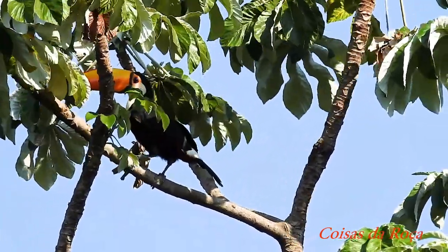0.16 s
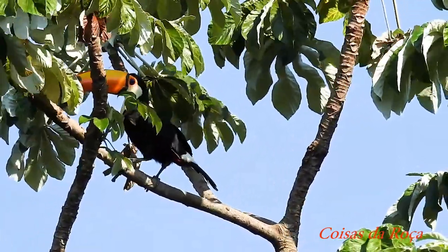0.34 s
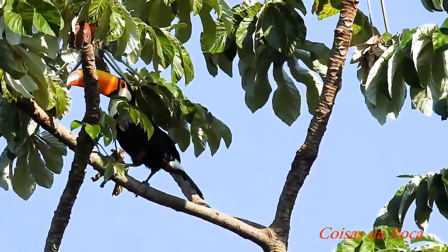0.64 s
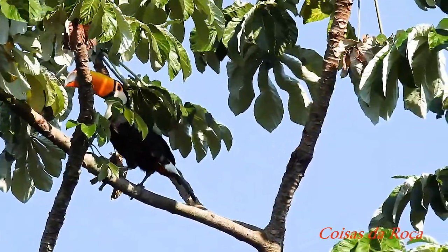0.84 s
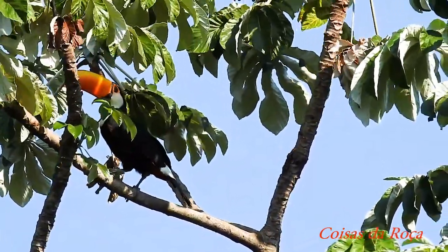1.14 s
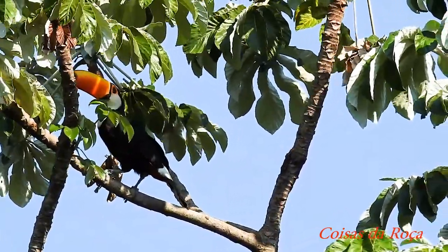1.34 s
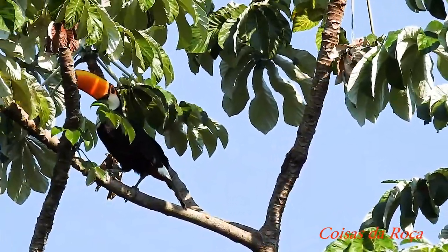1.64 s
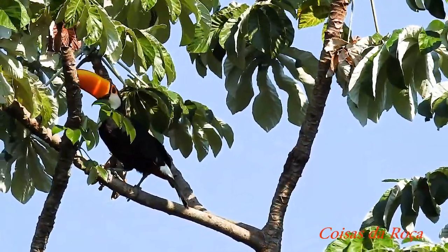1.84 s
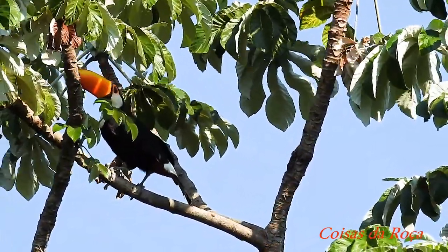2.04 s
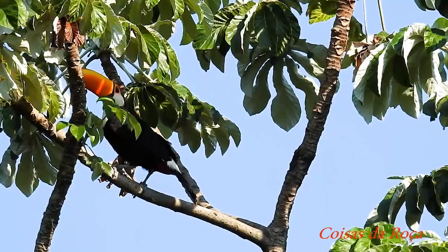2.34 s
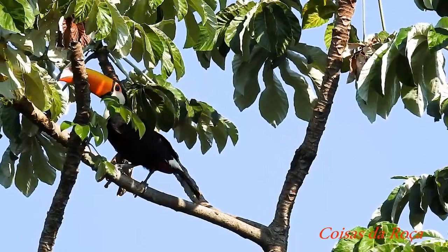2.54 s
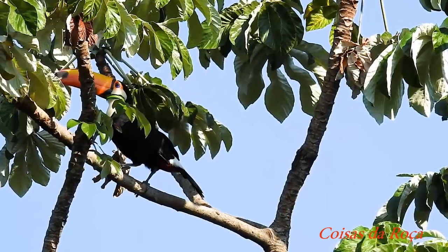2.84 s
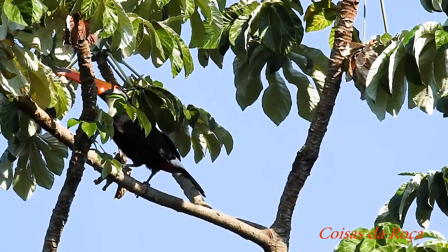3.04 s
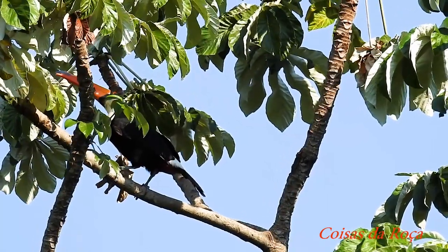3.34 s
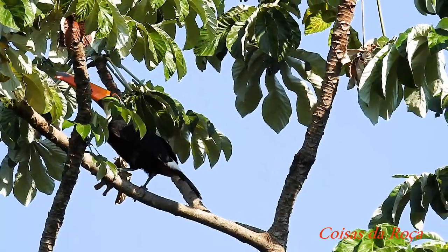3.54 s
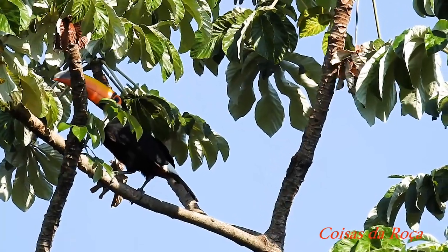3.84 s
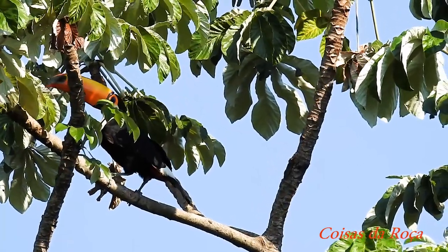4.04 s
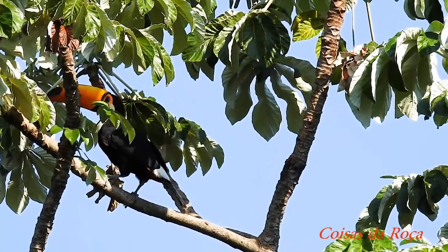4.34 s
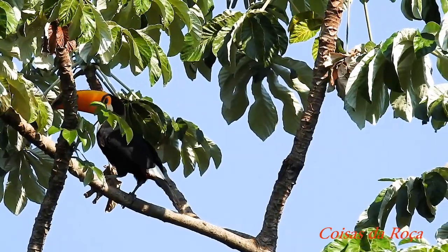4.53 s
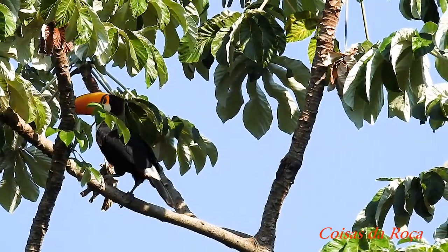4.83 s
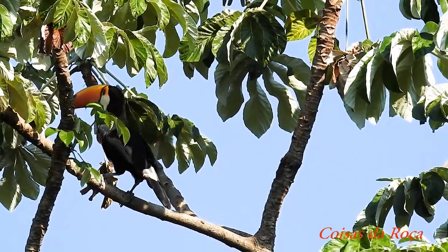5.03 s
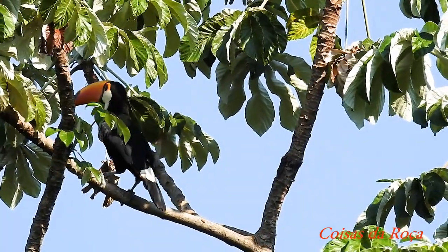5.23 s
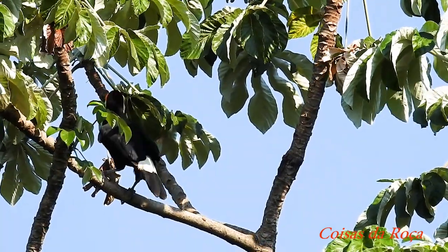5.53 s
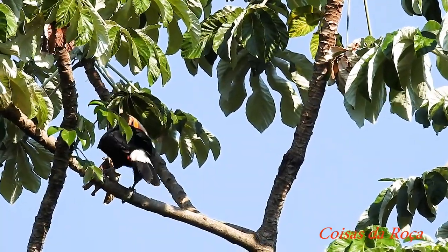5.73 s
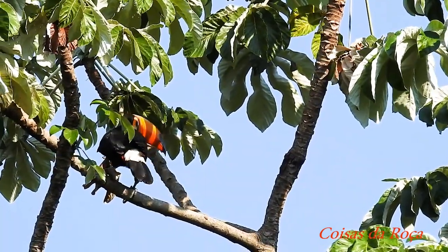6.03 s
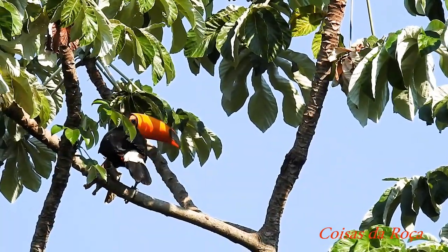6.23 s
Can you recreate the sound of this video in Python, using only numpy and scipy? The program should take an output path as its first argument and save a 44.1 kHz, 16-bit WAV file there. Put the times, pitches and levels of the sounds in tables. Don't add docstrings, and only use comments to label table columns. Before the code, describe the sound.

A big-billed bird gives slow hollow croaking rattles among trees while another squawks hoarsely and whistles one arched note over crickets and insect haze.

```python
import sys
import numpy as np
from scipy import signal
from scipy.fft import rfft, irfft, next_fast_len
from scipy.io import wavfile
from scipy.ndimage import uniform_filter1d, map_coordinates

SR = 44100
rng = np.random.default_rng(int(sys.argv[2]) if len(sys.argv) > 2 else 0)


def level_to_linear(level):
    exponent = np.asarray(level, float) / 20
    return 10 ** exponent


def master_out(mix):
    frames = np.transpose(np.atleast_2d(mix))
    ceiling = np.clip(frames, -1, 1)
    pcm = np.round(ceiling * 32767).astype(np.int16)
    wavfile.write(sys.argv[1], SR, pcm)


N = 281358
T = np.arange(N) / SR


def unit(x):
    return x / np.sqrt(np.mean(x ** 2) + 1e-20)


def along(points, hz):
    f, v = np.transpose(points)
    return np.interp(np.log(hz + 1), np.log(f + 1), v)


def curves(rows):
    s, *cols = np.transpose(rows)
    gate = np.clip(np.minimum(T - s[0], s[-1] - T) / 0.0027, 0, 1)
    return [np.interp(T, s, c) for c in cols] + [gate]


def wobble(rate):
    return map_coordinates(rng.standard_normal(int(N * rate / SR) + 4), [T * rate])


def bell(centre, half):
    return np.exp(-((T - centre) / half) ** 2)


def filtered(x, response):
    m = next_fast_len(N + SR // 2)
    return irfft(rfft(x, m) * response(np.fft.rfftfreq(m, 1 / SR)), m)[..., :N]


def cavities(modes):
    def response(f):
        return sum((-1) ** k * level_to_linear(db) * 1j * f * w / (c * c - f * f + 1j * f * w)
                   for k, (c, w, db) in enumerate(modes))
    return response


def rush(spectrum, alike, patchy_db):
    z = signal.stft(rng.standard_normal((2, N)), nperseg=512)[2]
    field = uniform_filter1d(rng.standard_normal(z.shape[1:]), size=6, axis=0)
    field = uniform_filter1d(field, size=14, axis=1)
    pair = signal.istft(z * level_to_linear(patchy_db * unit(field)), nperseg=512)[1][:, :N]

    def response(hz):
        turn = np.arccos(np.clip(along(alike, hz), -1, 1)) / 2
        return level_to_linear(along(spectrum, hz)) * [np.cos(turn), np.sin(turn)]
    mid, side = filtered(pair, response)
    return unit(np.array([mid + side, mid - side]))


# frequency_hz, t60_s
TREE_DECAY = [(500, 0.19), (1500, 0.39), (3500, 0.42), (9000, 0.31)]


def trees(x, wet_db, side_db, pan_db, gap):
    hz, t, z = signal.stft(rng.standard_normal((2, SR * 3 // 5)), SR, nperseg=256)
    decay = level_to_linear(-60 * t / along(TREE_DECAY, hz)[:, None])
    tail = signal.istft(z * decay, SR, nperseg=256)[1]
    tail = np.pad(tail / np.linalg.norm(tail[0]), ((0, 0), (round(gap * SR), 0)))
    mid, side = signal.fftconvolve(x[None], tail, axes=1)[:, :N] * level_to_linear([[wet_db], [side_db]])
    return (x + mid) * level_to_linear([[pan_db / 2], [-pan_db / 2]]) + side * [[1], [-1]]


# frequency_hz, level_db
HAZE = [(60, -21), (100, -13.5), (200, -8.5), (400, -9), (800, -8), (1600, -10), (2600, -12), (3600, -15),
        (4300, -10), (5000, -8.5), (6900, -10), (7500, -17), (10000, -21), (15800, -23)]
# frequency_hz, likeness (0 to 1)
ALIKE = [(60, 0.98), (130, 0.94), (290, 0.62), (640, 0.081), (1410, 0.0073), (3100, 0.38), (6820, 0.52),
         (15000, 1)]


def haze():
    level_db = -54.5 + 0.23 * wobble(1.3) + 0.17 * wobble(24)
    return level_to_linear(level_db) * rush(HAZE, ALIKE, patchy_db=2.4)


# frequency_hz, level_db
CHORUS = [(5600, -16), (5900, -2), (6150, 2), (6450, -4), (6800, -26)]
# time_s, level_db
CHORUS_SWELL = [(0, -61), (.8, -63), (1.3, -59.5), (2.5, -58), (3.1, -60.5), (4.3, -63.5), (5.1, -55.5),
                (5.6, -58.5), (6.38, -56.5)]


def chorus():
    level_db = curves(CHORUS_SWELL)[0] + 0.83 * wobble(47)
    return level_to_linear(level_db) * rush(CHORUS, ALIKE, patchy_db=4.0)


# pitch_hz, width_hz, level_db
DRONES = [(467.7, 7.2, -71.5), (740, 35, -72.5)]


def drones():
    pause_s, pause_db, return_s = 3.75, -13, 0.98
    out = np.zeros(N)
    for hz, width, db in DRONES:
        tone = unit(filtered(rng.standard_normal(N), cavities([(hz, width, 0)])))
        out += level_to_linear(db + 0.6 + 0.98 * wobble(3.6)) * tone
    dip = (T > pause_s) * np.clip(1 - (T - pause_s) / return_s, 0, 1)
    return level_to_linear(pause_db * dip) * out


# time_s, half_length_s, level_db
GUSTS = [(.8, .15, -84), (1.967, 0.07, -65), (2.164, 0.031, -72), (2.54, 0.14, -70), (3.073, .03, -60),
         (3.222, 0.078, -48.5), (3.565, 0.051, -59.5), (4.045, 0.045, -61), (4.578, .06, -66),
         (4.762, 0.062, -57.5), (4.932, 0.047, -57), (5.048, 0.046, -50), (5.18, .04, -48),
         (5.42, 0.071, -68), (5.804, 0.097, -70), (6.022, 0.033, -69), (6.2, 0.032, -63),
         (6.38, 0.059, -69)]


def gusts():
    calm = level_to_linear(-76.5 + 3.2 * wobble(11))
    return calm + sum(level_to_linear(db) * bell(s, half) for s, half, db in GUSTS)


# frequency_hz, level_db
BUMP = [(15, -36), (25, -13.5), (40, 2), (65, -1), (115, -9), (250, -34), (400, -87)]


def wind():
    rumble = rush(BUMP, [(30, 0.985)], patchy_db=.7)
    return gusts() * unit(level_to_linear(1.5 * wobble(20)) * rumble)


# pitch_hz, level_db
WHINE = [(15734.33, -71), (15747.25, -76)]


def whine():
    return sum(level_to_linear(db + 3.5) * np.cos(2 * np.pi * hz * T) for hz, db in WHINE)


# start_s, end_s, stroke_rate_hz, level_db
CHIRPS = [
    (0.1526, 0.73, 34.7, -58),
    (1.1834, 1.73, 34.65, -57),
    (2.1865, 2.75, 34.7, -57),
    (3.1861, 3.75, 34.55, -56),
    (4.669, 4.8, 35.3, -59),
    (5.2952, 5.87, 34.7, -57),
    (6.266, 6.38, 33.0, -59),
]


def cricket():
    out = np.zeros(N)
    for start, end, rate, db in CHIRPS:
        stroke = (T - start) * rate
        fade = np.clip((T - start) / 0.039, 0, 1) * (stroke > 0) * (T < end)
        luck = rng.random((60, 2))[np.clip(stroke, 0, 59).astype(int)]
        shape = np.sin(np.pi * (stroke % 1)) ** 2
        tone = np.sin(2 * np.pi * (6070 * T + luck[:, 1]))
        out += level_to_linear(db + 2.5 + 7.3 * luck[:, 0]) * fade * shape * tone
    return trees(out, wet_db=-27, side_db=-39.0, pan_db=-3.5, gap=.004)


def slaps(end, db, bend, turn_db, bill_db):
    slowest_gap_s, quickens = .0245, .175
    build_db, dying_db = -17, -19
    throat_hz, slack_hz_per_db, turn_hz_per_db = 1640, 12, -30
    click_db, click_holds = -11, .55
    back = np.arange(8)
    gaps = slowest_gap_s * np.maximum(back, 1.0) ** -quickens * (back > 0)
    s = np.append(end - np.cumsum(gaps), end + slowest_gap_s)
    under = np.append(build_db * (back / back[-1]) ** bend, dying_db)
    first = np.append(back == back[-1], 0)
    turn = turn_db * np.append(back < 3, 0)
    luck = rng.standard_normal((9, 3)) * [.6, 35, 1.2]
    click = click_db + bill_db - click_holds * under - 9 * first
    hz = throat_hz + slack_hz_per_db * under + turn_hz_per_db * turn
    return np.c_[s, np.c_[db + under + turn - 5 * first, hz, click] + luck]


# frequency_hz, width_hz, level_db
BILL = [(624, 143, -6.5), (1027, 41, -5.5), (1370, 247, 5), (1954, 310, 2), (2380, 160, -1), (2900, 210, 5),
        (3460, 500, -4.5), (3940, 120, -5), (4520, 490, -11.5), (8200, 18000, -30)]


def rattle(rows, shake, wet_db, side_db, pan_db):
    tone, click, t = np.zeros(N + SR), np.zeros(N + SR), np.arange(SR // 25) / SR
    swell = np.exp(-((t - .006) / np.where(t < .006, .0038, .0046)) ** 2)
    swell += 0.15 * np.exp(-((t - .015) / 0.005) ** 2)
    snap = np.exp(-((t - .005) / np.where(t < .005, .003, .006)) ** 2)
    for s, db, hz, click_db in rows:
        start = round((s - .003) * SR)
        tone[start:][:len(t)] += level_to_linear(db - 3.0) * swell * np.sin(2 * np.pi * (hz * t + rng.random()))
        puff = snap * rng.standard_normal(len(t))
        click[start - 60:][:len(t)] += level_to_linear(db + click_db + 10.0) * puff
    shaky = tone[:N] * (1 + shake * wobble(600))
    return trees(shaky + filtered(click[:N], cavities(BILL)), wet_db, side_db, pan_db, gap=0.0093)


# last_full_slap_s, peak_db, build_bend (how early it builds), turn_away_db, bill_db
CROAKS = [
    (1.3515, -21.5, 1.9, 0, 0),
    (2.897, -18, 1.6, 0, -2),
    (4.9835, -17, 2.2, -7.5, -3.5),
    (5.742, -19.5, 1.1, 0, -5),
]


def croaks():
    rows = np.concatenate([slaps(*row) for row in CROAKS])
    return rattle(rows, .15, wet_db=-11, side_db=-21.5, pan_db=-1.5)


def opening(opens, full, closes, fade, db):
    opening_db, choke_s, choke_db_per_s = 21.5, 2.0314, 904
    rise = opening_db * np.clip((T - full) / (full - opens), None, 0)
    fall = fade * np.clip(T - closes, 0, None) + choke_db_per_s * np.clip(T - choke_s, 0, None)
    return level_to_linear(db + rise - fall) * (T > opens)


# opens_s, full_s, closes_s, fade_db_per_s, level_db
SQUAWK = [
    (1.83, 1.90, 1.9645, 219, -35),
    (1.846, 1.853, 1.862, 95, -29),
    (1.835, 1.866, 2.03, 304, -29),
    (1.85, 1.916, 2.02, 306, -32.5),
]
# frequency_hz, width_hz, level_db
CHEST = [(373, 91, -12), (519.5, 39.4, -2.5), (730, 140, -11)]
THROAT = [(920, 62, -4), (1242, 200, 5), (1562, 120, 3.5), (1859, 148, 6.5)]
MOUTH = [(2444, 150, -3.5), (2710, 82, 1.5), (2788, 45, 5.5), (3250, 510, -4)]
BEAK = [(3600, 57, -6.5), (3580, 100, 3.5), (3800, 970, -9), (4440, 770, -3), (4990, 360, -2),
        (6270, 5000, -10.5)]
# top_s, peak_db, pitch_hz, half_length_s
THROBS = [
    (1.839, -28.5, 2480, 0.0018),
    (1.856, -20, 1506, 0.0035),
    (1.893, -20, 2594, 0.0038),
    (1.924, -15, 3620, 0.0011),
    (1.945, -11, 3560, 0.0022),
    (1.964, -11.5, 3628, 0.0026),
    (1.987, -13.5, 3590, 0.0034),
    (2.01, -22, 3600, 0.0034),
    (2.035, -26, 3600, 0.0025),
]
# start_s, fade_s, level_db
PUFFS = [
    (1.785, 0.027, -54),
    (1.861, 0.18, -41.5),
]
# frequency_hz, level_db
AIR = [(4500, -30), (5500, -12), (7000, -5.5), (8500, -1.5), (10500, -5), (11500, -27)]


def squawk():
    repeat_s = 4.05687
    cycles = np.cumsum(245 * (1 + 0.066 * wobble(60))) / SR
    pulses = np.diff(np.floor(cycles), prepend=0) * level_to_linear(3 * wobble(150))
    gated = rng.standard_normal(N) * np.exp(-2.5 * (cycles % 1))
    voice = 0.59 * unit(pulses) + .8 * unit(gated)
    voice = voice * level_to_linear(2.5 * wobble(200) + 2.5 * wobble(60))
    grunt = bell(1.786, .012)
    grunt_db = [-52, -55, -55.5, -93]
    call = np.zeros(N)
    for row, db, modes in zip(SQUAWK, grunt_db, (CHEST, THROAT, MOUTH, BEAK)):
        def steep(hz):
            return cavities(modes)(hz) ** 1.495 / (1 + (hz / 7200) ** 14)
        call += (opening(*row) + level_to_linear(db) * grunt) * unit(filtered(voice, steep))
    t = T[:round(2.2 * SR)]
    for s, db, hz, half in THROBS:
        call[:len(t)] += level_to_linear(db) * np.exp(-((t - s) / half) ** 2) * np.sin(2 * np.pi * hz * t)
    breath = sum(level_to_linear(db) * np.clip((T - s) / 0.0038, 0, 1) * np.exp(-np.abs(T - s) / fade)
                 for s, fade, db in PUFFS)
    breath = breath * np.clip((2.1 - T) / .1, 0, 1)
    once = trees(call, wet_db=-2, side_db=-6.5, pan_db=0.2, gap=.006)
    once = once + breath * rush(AIR, [(7000, .1)], patchy_db=1)
    return once + np.roll(once, round(repeat_s * SR), axis=1) * (T > repeat_s)


# time_s, pitch_hz, effort_db
WHISTLE = [
    (3.45, 639, -59.5),
    (3.515, 990, -35.5),
    (3.56, 1273, -32.5),
    (3.65, 1424, -27.5),
    (3.74, 1432, -38.5),
    (3.785, 1416, -24.5),
    (3.95, 1288, -26),
    (4.08, 1070, -30),
    (4.18, 770, -54),
]
TONES = [-14, -12.5, -6, -24]
SWINGS = [.7, .4, 1.0, -.2]
# frequency_hz, level_db
GAPE = [(2500, -11), (3500, -13), (5000, -22), (6000, -24), (7200, -26.5), (8500, -26), (10000, -38.5),
        (11500, -45), (13000, -68)]


def whistle():
    hz, db, on = curves(WHISTLE)
    rasp = bell(WHISTLE[0][0], .105) + .6 * bell(WHISTLE[-1][0], .085)
    pinch = -14 * np.exp(-((hz - 1432) / 11.6) ** 2)
    loud = np.clip(db + 31.5, 0, None) + np.clip(db + 33, -9, 0)
    levels = []
    for k, (tone, swing) in enumerate(zip(TONES, SWINGS), 1):
        pipe = 8 * np.exp(-((k * hz - 3850) / 1500) ** 2)
        levels.append(db + tone + (swing - 1) * loud + 2.5 * wobble(28) + pipe)
    levels[0] = levels[0] + pinch
    hz = uniform_filter1d(hz, size=1800) * (1 + 0.0016 * wobble(40) + 0.0595 * rasp * wobble(350))
    phase = 2 * np.pi * np.cumsum(hz) / SR
    tones = sum(level_to_linear(level) * np.sin(k * (phase + 0.57 * rasp * wobble(250)))
                for k, level in enumerate(levels, 1))
    blur = 6 * rasp ** .7
    effort = uniform_filter1d(level_to_linear(db - 0.64 * loud + 1.0), size=2000) * (1 - .6 * rasp * (T < 3.8))
    for k in range(5, 9):
        colour = level_to_linear(along(GAPE, k * hz) + 3.5 * wobble(11))
        tones = tones + effort * colour * np.sin(k * phase + blur * wobble(300))
    return trees(np.sqrt(2) * on * tones, wet_db=-2.0, side_db=-5.5, pan_db=1.0, gap=0.0037)


# last_slap_s, peak_db, throat_hz, slap_count
ANSWER = [
    (4.27, -47, 1412, 3),
    (4.369, -43.5, 2364, 3.3),
    (4.421, -50.5, 2514, 2),
    (5.418, -53, 2900, 2.5),
]


def answer():
    rows = [(s - 0.02 * k, db - 0.74 * k, hz, -9) for s, db, hz, count in ANSWER for k in range(int(count))]
    return level_to_linear(-3.0) * rattle(rows, 1.6, wet_db=-1.5, side_db=-7.5, pan_db=.3)


# time_s, pitch_hz, level_db
FAR = [
    [(4.74, 2620, -74), (4.756, 2462, -59), (4.838, 2048, -47.5), (4.87, 1900, -58)],
    [(5.11, 1870, -70), (5.2, 2270, -65), (5.31, 2520, -58), (5.38, 2550, -65), (5.57, 2550, -66)],
]


def far_birds():
    song = np.zeros(N)
    for rows in FAR:
        hz, db, on = curves(rows)
        phase = 2 * np.pi * np.cumsum(uniform_filter1d(hz, size=900)) / SR
        fourth = level_to_linear(-14) * np.sin(4 * phase) * (T > 5.2)
        fifth = level_to_linear(-8) * np.sin(5 * phase) * (T > 5.14) * (T < 5.23)
        song += on * level_to_linear(db + 4.9 * wobble(40)) * (np.sin(phase) + fourth + fifth)
    return trees(song, wet_db=-1, side_db=-8, pan_db=-.7, gap=.015)


def scene():
    ambience = haze() + chorus() + drones() + wind() + whine()
    return ambience + cricket() + croaks() + squawk() + whistle() + answer() + far_birds()


# from_hz, width_hz, threshold_db
STARVED = [(7500, 400, -24), (8700, 500, -23), (10000, 400, -23), (11200, 800, -28), (12000, 800, -25),
           (12800, 900, -26), (13700, 900, -21), (14600, 900, -23)]


def thinned(dry):
    loudness = np.sqrt(np.abs(uniform_filter1d(dry.mean(0) ** 2, size=4096)))
    kept = filtered(dry, lambda hz: hz < 15870)
    for low, width, db in STARVED:
        starved = (loudness * level_to_linear(6 * wobble(16)) > level_to_linear(db)).astype(float)
        band = filtered(dry, lambda hz: (hz > low) & (hz < low + width))
        kept = kept - uniform_filter1d(starved, size=512) * band
    return kept


def roll_off(x):
    return signal.sosfilt(signal.butter(12, 16620, fs=SR, output="sos"), x)


def record(dry):
    mix = thinned(dry)
    return roll_off(mix)


dry = scene()
out = record(dry)
master_out(out)
```